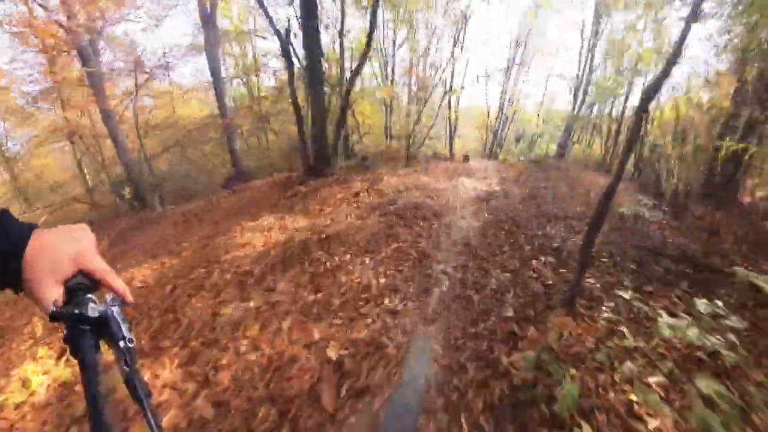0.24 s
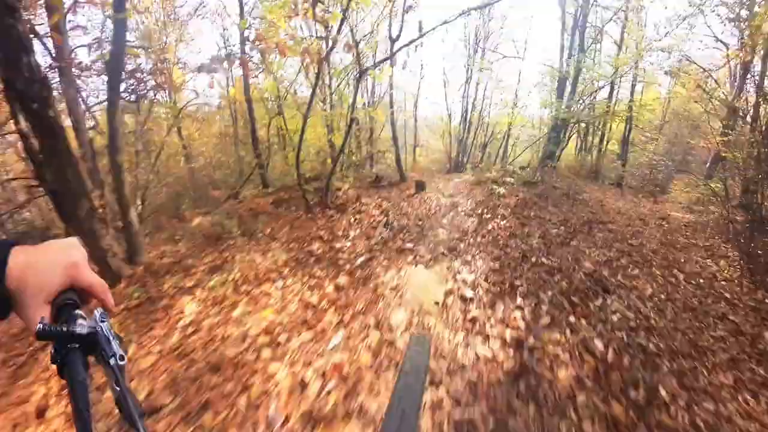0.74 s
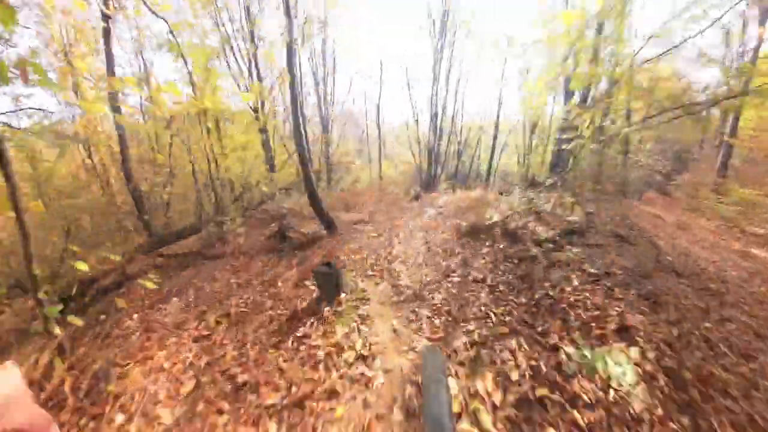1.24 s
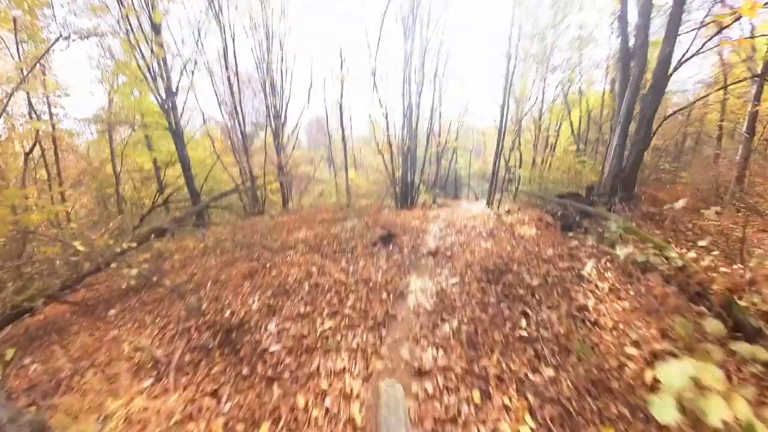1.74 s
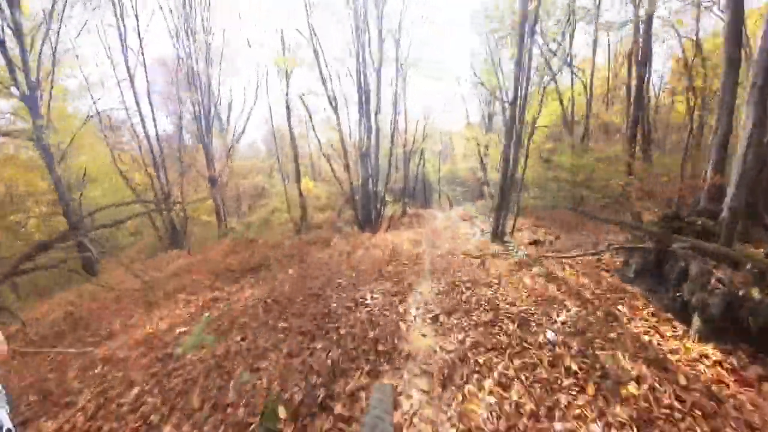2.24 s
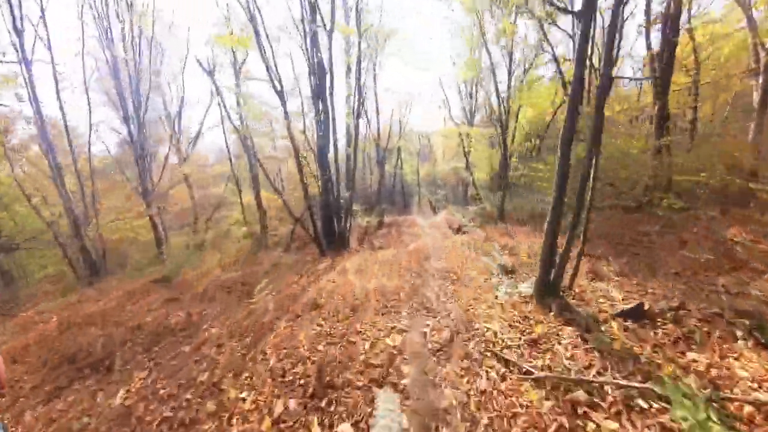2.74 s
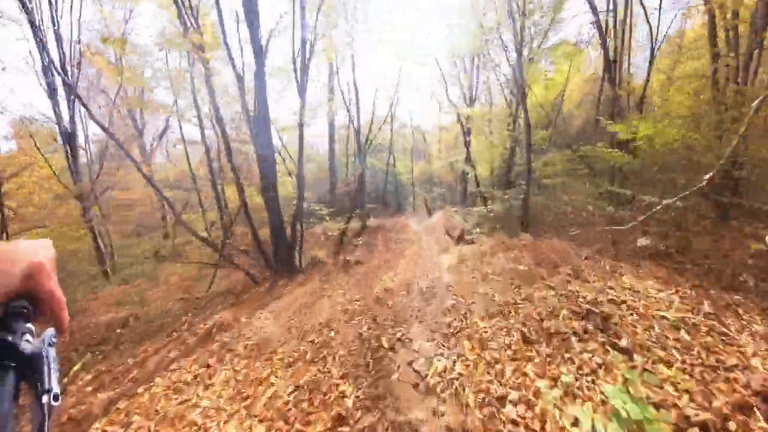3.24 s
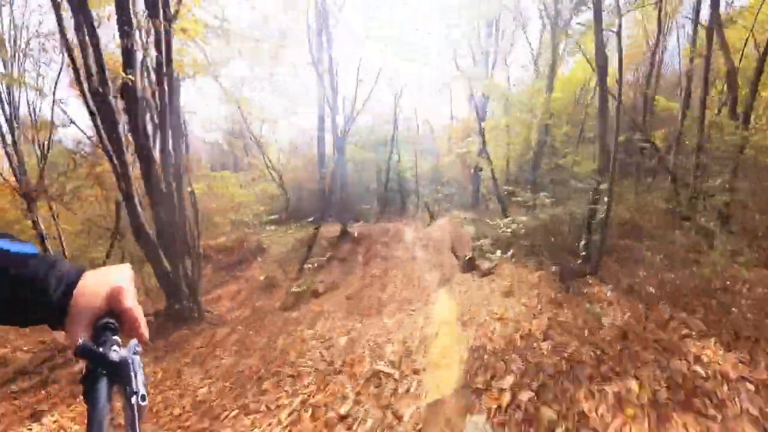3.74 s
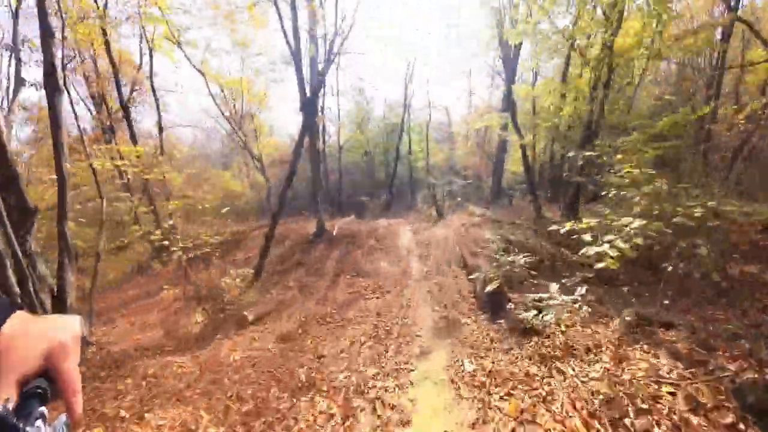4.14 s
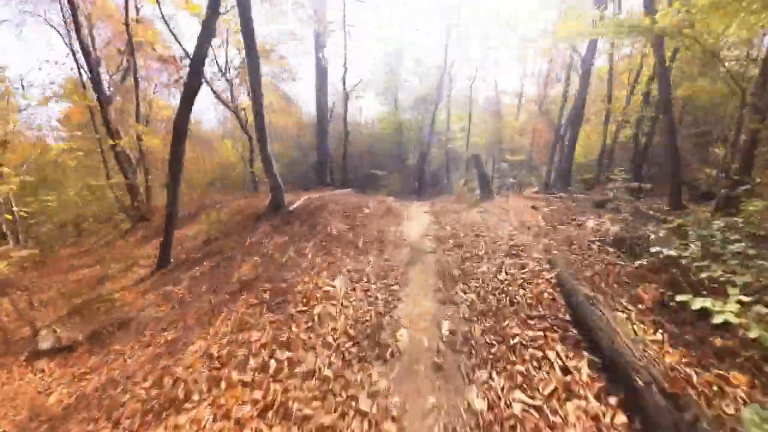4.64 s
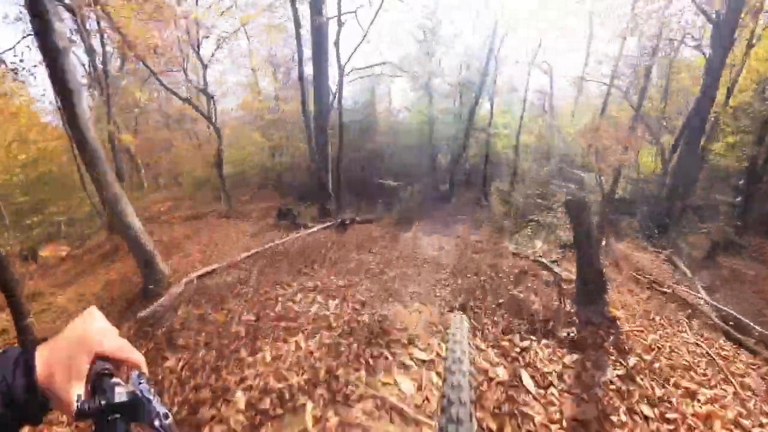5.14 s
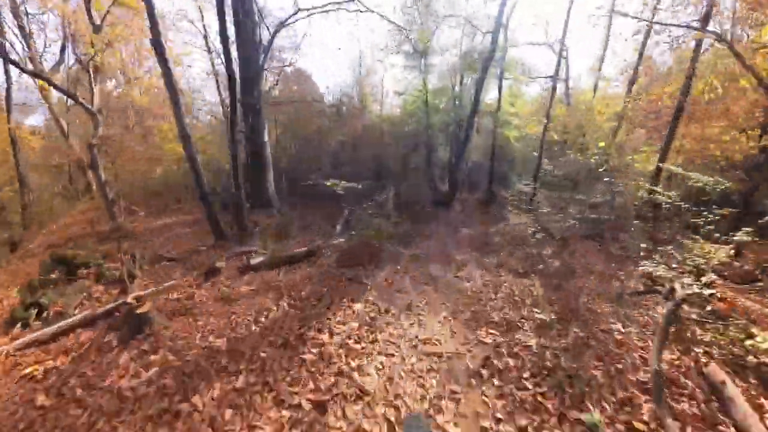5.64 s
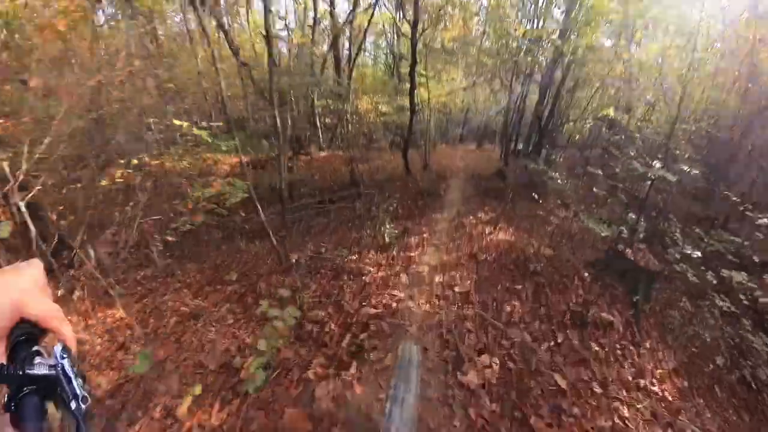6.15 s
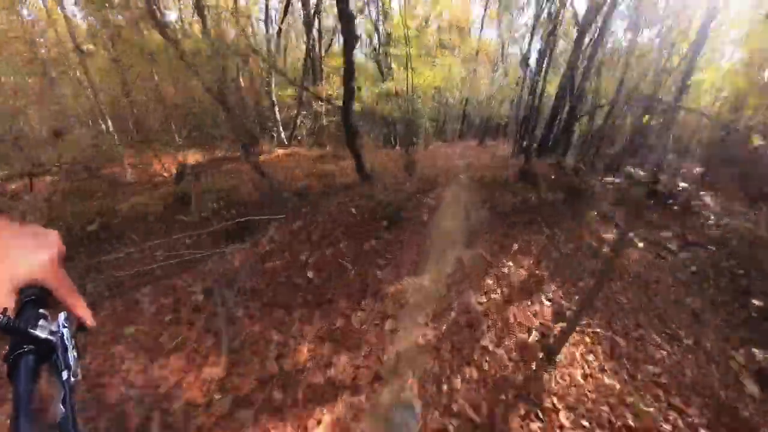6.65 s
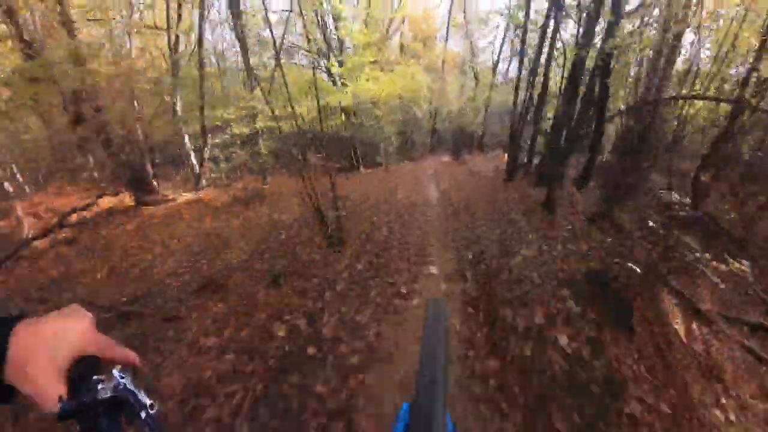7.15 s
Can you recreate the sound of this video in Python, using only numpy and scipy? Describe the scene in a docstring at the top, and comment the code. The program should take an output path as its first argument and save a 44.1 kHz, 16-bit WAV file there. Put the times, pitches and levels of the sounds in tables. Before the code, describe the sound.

A mountain bike rolls down a leafy dirt trail with a deep wobbling rumble, thumps, frame rattles and crackling dry leaves.

```python
"""Low wobble and thumps of a mountain bike rolling down a dirt trail under dry leaves.
A camera mount strapped to the rider swings near 43 Hz and jolts over roots and stones.
Tyres rumble, loose parts ring the frame and chain, leaves crunch through the microphone's
whistling port. Faint fuzzy whistles come and go; loud thumps duck the treble."""
import sys
import numpy as np
from scipy import signal
from scipy.fft import rfft, irfft, next_fast_len
from scipy.io import wavfile
from scipy.ndimage import uniform_filter1d

SR = 44100
rng = np.random.default_rng(int(sys.argv[2]) if len(sys.argv) > 2 else 0)


def log_audio(samples):
    """Write samples as a 16-bit WAV file to the path given in sys.argv[1]."""
    # one column per channel
    frames = np.atleast_2d(samples).T
    # limit to full scale, then quantise
    limited = np.clip(frames, -1, 1)
    pcm = np.round(limited * 32767).astype(np.int16)
    wavfile.write(sys.argv[1], SR, pcm)


N = 325458

# root and stone impacts: (time [s], level [dB])
JOLTS = [(0.048, -4), (0.068, -10.5), (0.182, -7.5), (0.41, -7), (0.572, -16), (0.588, -17.5),
         (0.725, -16.5), (0.738, -7), (0.786, -16), (0.804, -7), (0.929, -9), (0.974, -20), (1.038, -7.5),
         (1.051, -13), (1.067, -12.5), (1.125, -18.5), (1.211, -6.5), (1.229, -8.5), (1.398, -21),
         (1.414, -4), (1.431, -14), (1.486, -18.5), (1.595, -11.5), (1.621, -10), (1.75, -9.5),
         (1.76, -7.5), (1.776, -9), (1.873, -10.5), (1.886, -10), (1.902, -10), (1.984, -7.5), (2.069, -10),
         (2.262, -10), (2.35, -10), (2.363, -10.5), (2.472, -20), (2.704, -8), (2.772, -9), (2.791, -7),
         (3.224, -17.5), (3.476, -17.5), (3.527, -31), (3.546, -6), (3.814, -9.5), (4.016, -13.5),
         (4.029, -16), (4.14, -11.5), (4.306, -15), (4.347, -17), (4.676, -14), (4.698, -11), (4.783, -10),
         (4.797, -9), (5.038, -22), (5.355, -18), (5.511, -12.5), (5.648, -13.5), (5.728, -15),
         (5.755, -10.5), (5.773, -13), (5.828, -2), (5.843, -12), (5.893, -12.5), (5.96, -8.5),
         (5.981, -13), (6.212, -6), (6.231, -30), (6.24, -8.5), (6.46, -15.5), (6.576, -9.5), (6.591, -7),
         (6.764, -13.5), (6.818, -15.5), (6.844, -9), (7.096, -23), (7.108, -22)]
# loose parts hitting the frame:
# (time [s], level [dB], frame centre [Hz], clink re knock [dB], clink centre [Hz])
KNOCKS = [(0.08, -28, 402, -27, 2480), (0.17, -32, 388, -42, 3180), (0.27, -35.5, 636, -25, 2212),
          (0.367, -33.5, 600, -22, 2300), (0.393, -41, 500, -30, 2300), (0.4225, -24, 615, -33, 2067),
          (0.569, -37, 495, -30, 2200), (0.9, -42, 952, -8, 3840), (0.922, -28, 373, -28, 2707),
          (1.029, -32, 324.8, -39, 2360), (1.058, -30.5, 458.3, -31, 2336), (1.213, -15.5, 722, -21, 2030),
          (1.274, -18, 710, -27, 2140), (1.329, -27.5, 770, -32, 2800), (1.584, -25.5, 531, -15, 3850),
          (1.616, -40, 502, -25, 2373), (1.746, -30, 343, -17, 2950), (1.84, -20, 554, -21, 3170),
          (1.946, -31, 607, -26, 2417), (1.97, -19.5, 540.5, -30.5, 2437), (2.215, -22.5, 700, -36, 2980),
          (2.2519, -22, 699, -18, 4220), (2.338, -23, 511, -27, 3056), (2.67, -23, 848.7, -16.5, 2625),
          (2.688, -14.5, 582, -22, 2520), (2.737, -19, 786, -19, 2670), (2.755, -19, 650, -26, 4190),
          (2.842, -23, 614.6, -24, 2483), (2.906, -34.5, 556.5, -33, 3952), (2.984, -32.5, 754, -16, 3210),
          (3.211, -40, 962, -1, 2662), (3.242, -46, 1118, -1.5, 2586), (3.406, -30, 556.6, -20, 3604),
          (3.506, -27.5, 751, -29, 3967), (3.646, -34.5, 949, -9, 3896), (3.774, -26, 665.4, -34, 3716),
          (4.01, -35, 378, -35, 3776), (4.092, -30, 901, -19, 3730), (4.192, -30.5, 735.5, -24, 2750),
          (4.339, -22, 452.8, -22.5, 4320), (4.471, -31, 611.7, -28, 3694), (4.548, -17, 561.7, -20, 2985),
          (4.621, -37, 595, -22, 3030), (4.673, -17.5, 485.4, -29, 3160), (4.745, -21, 653.2, -24, 3678),
          (5.024, -25, 320, -29, 3525), (5.426, -25, 495.5, -39, 3120), (5.467, -23.5, 702.7, -29, 2402),
          (5.618, -27, 547, -15, 3461), (5.802, -21, 427.2, -36, 3154), (5.949, -26.5, 561, -33, 2407),
          (6.046, -44, 775.3, -26, 2292), (6.206, -18.5, 841, -18.5, 4598), (6.298, -31.5, 473, -25, 2076),
          (6.468, -22, 707, -19.5, 2513), (6.551, -24.5, 603, -18, 2194), (6.566, -20, 598.4, -18, 2574),
          (6.839, -35, 351.8, -34, 2365), (7.03, -20.5, 705.4, -32, 2403),
          (7.103, -17.5, 605.4, -42.5, 3050), (7.224, -25.5, 431.5, -25, 2861)]


def mount_wobble(rest_db=-31.5, drift=0.048, slip=0.3366, overtone_db=-20,
                 wind_db=-9, wind_hz=40, wind_bandwidth_hz=50):
    """One low mode, pushed off pitch by the ground, most when it swings least; gusts flutter with it."""
    # bouts of swinging on the strap: (middle [s], length [s], level [dB], pitch [Hz])
    swings = [(0.065, 0.11, -21, 45.8), (0.124, 0.073, -13.5, 42.9), (0.232, 0.15, -17, 38.5),
              (0.307, 0.043, -16, 45.4), (0.374, 0.08, -14, 45.8), (0.492, 0.13, -19.5, 42.27),
              (0.609, 0.25, -16.5, 40.74), (0.739, 0.042, -10, 40.54), (0.813, 0.12, -16.5, 39.65),
              (0.949, 0.12, -15, 46.1), (1.071, 0.089, -15.5, 37.14), (1.142, 0.024, -11.5, 44.64),
              (1.229, 0.268, -19.5, 44), (1.437, 0.051, -10, 46.17), (1.506, 0.066, -17, 42.3),
              (1.621, 0.53, -19.5, 41.57), (1.783, 0.074, -28, 40.26), (1.909, 0.18, -16, 43.37),
              (2.007, 0.092, -20, 52.56), (2.115, 0.19, -17, 42.1), (2.268, 0.096, -15, 49.86),
              (2.383, 0.099, -15, 43.25), (2.5, 0.086, -16.5, 45.6), (2.748, 0.4, -18.5, 45.7),
              (2.849, 0.33, -20.5, 45.04), (3.012, 0.12, -18.5, 43.45), (3.219, 0.4, -15.5, 44.2),
              (3.532, 0.15, -14.5, 42.7), (3.683, 0.17, -14.5, 47.7), (3.877, 0.29, -13, 46.4),
              (4.03, 0.042, -15.5, 43.28), (4.186, 0.17, -14, 44.7), (4.357, 0.094, -13.5, 50.28),
              (4.447, 0.21, -17, 44.47), (4.575, 0.19, -20, 45.36), (4.7, 0.071, -15, 46.32),
              (4.808, 0.2, -15, 44.04), (4.929, 0.085, -15, 45.85), (5.037, 0.045, -12.5, 48.93),
              (5.094, 0.07, -16.5, 46.8), (5.167, 0.15, -15.5, 42.23), (5.355, 0.092, -15, 45.71),
              (5.437, 0.13, -19, 52.5), (5.536, 0.17, -19.5, 40.6), (5.659, 0.093, -13, 46.1),
              (5.773, 0.16, -14, 46.5), (5.874, 0.096, -13, 40.58), (6.023, 0.3, -15.5, 38.45),
              (6.236, 0.11, -13.5, 45.56), (6.328, 0.094, -17, 47.83), (6.501, 0.11, -18, 45.55),
              (6.605, 0.13, -15, 43.8), (6.782, 0.077, -12.5, 42.1), (6.862, 0.064, -14.5, 40.73),
              (6.95, 0.067, -13.5, 51.7), (7.002, 0.039, -17.5, 52.98), (7.068, 0.054, -17, 45.9),
              (7.154, 0.18, -18.5, 50.72), (7.251, 0.092, -14, 43.86)]
    power = np.full(N, amp(2 * rest_db))
    for s, length_s, db, _ in swings:
        arch = np.sin(np.linspace(0, np.pi, round(length_s * SR)))
        add(power, s - length_s / 2, (amp(db) * arch) ** 2)
    level = np.sqrt(power)
    pitch_hz = curves([(s, hz) for s, _, _, hz in swings])[0]
    pitch_spread = drift + slip * np.clip(1 - level / 0.0816, 0, 1)
    phase = 2 * np.pi * np.cumsum(pitch_hz * (1 + pitch_spread * wander(ms=14.8))) / SR
    swing = np.sqrt(2) * (np.sin(phase) + amp(overtone_db) * np.cos(2 * phase))
    b, a = signal.iirpeak(wind_hz, wind_hz / wind_bandwidth_hz, SR)
    wind = signal.lfilter(b, a, signal.lfilter(b, a, rng.standard_normal(N)))
    return level * unit_rms(swing + amp(wind_db) * unit_rms(wind))


def jolts(width_ms=1.18, rebound=0.29, rebound_widths=1.9, click_db=-22):
    """Each impact is a short push of either sign inside a wider, weaker swing the other way."""
    out, t_ms = np.zeros(N), np.arange(-800, 800) / SR * 1000
    for (s, db), (side, stretch) in zip(JOLTS, rng.uniform(-1.24, 1, (len(JOLTS), 2))):
        u = t_ms / (width_ms * (1 + stretch / 5))
        push = np.exp(-.5 * u ** 2) - rebound * np.exp(-.5 * ((u - 1.5) / rebound_widths) ** 2)
        click = amp(click_db) * np.exp(-np.hypot(3.7 * (u + 1), 0.25))  # sharp, at the thump's start
        add(out, s - 800 / SR, np.sign(side) * amp(db) * (push + click) / (1 - rebound))
    return out


def tyres(lumpy_db=2.5, gritty_db=8.0, taps_db=-6, taps_per_s=120):
    """Dirt heard through the frame: rumble swells at jolts, grit at knocks; single pebbles tap."""
    # rolling between bumps: (time [s], rumble [dB], grit [dB])
    rolling = [(0.1, -24.5, -53.5), (0.76, -34, -48), (1.28, -32, -46.5), (1.66, -32.5, -49.5),
               (2.14, -29, -44.5), (2.46, -36, -48), (2.75, -27, -50), (3.05, -42, -70.5),
               (3.35, -28.5, -52), (3.63, -27.5, -48.5), (3.85, -33, -72), (4.09, -33.5, -47),
               (4.61, -25.5, -46.5), (4.83, -31, -50.5), (5.39, -28, -46.5), (5.81, -27, -49.5),
               (6.32, -36.5, -47.5), (6.8, -33.5, -51.5), (7.12, -22.5, -39.5), (7.3, -25, -42)]
    # tyre rumble spectrum: (frequency [Hz], gain [dB])
    rumble_eq = [(35, -110), (60, 16), (73, -0.5), (102, -3), (174, -1.5), (500, -27), (650, -95),
                 (1100, -120)]
    # grit spectrum: (frequency [Hz], gain [dB])
    grit_eq = [(150, -70), (250, -9), (523, -6), (745, -14.5), (835, -11), (936, -23), (1400, -27),
               (1560, -32.5), (2020, -33.5), (3000, -43), (3900, -58), (6600, -120)]
    rumble_db, grit_db = curves(rolling)
    shudder = amp(-17.5) * swells(JOLTS, decay_ms=22.7, lead_ratio=0.78)
    scatter = amp(-17.5) * swells(KNOCKS, decay_ms=28.7, lead_ratio=0.2)
    roughness = wander(ms=12)
    rumble = coloured(amp(lumpy_db * roughness) * rng.standard_normal(N), rumble_eq)
    pebbles = (rng.random(N) < taps_per_s / SR) * rng.uniform(-0.71, 1, N)
    taps = coloured(uniform_filter1d(pebbles, size=20), grit_eq[1:])
    flicker = np.tanh((roughness + wander(ms=3) / 2) / 2)
    grit = coloured(amp(gritty_db * flicker) * rng.standard_normal(N), grit_eq)
    low = np.hypot(amp(rumble_db), shudder) * unit_rms(rumble)
    high = np.hypot(amp(grit_db), scatter) * (unit_rms(grit) + amp(taps_db) * unit_rms(taps))
    return low + high


def knocks(rise_s=0.00081):
    """Each blow rings the frame modes near its centre frequency; chain links clink and chatter."""
    # frame resonances: (frequency [Hz], relative level [dB], t60 [s])
    frame_modes = [(331, 11, 0.082), (396.6, 9.5, 0.078), (469, 6.5, 0.036), (562, 5.5, 0.037),
                   (686, -2.5, 0.05), (798, -6.5, 0.063), (1070, -12, 0.0045), (1353, -8.5, 0.067)]
    # chain resonances: (frequency [Hz], relative level [dB], t60 [s])
    chain_modes = [(1805, 14.5, 0.017), (2650, -2.5, 0.067), (3910, -1, 0.065), (4740, -4, 0.032),
                   (5420, -1.5, 0.033)]
    out, t = np.zeros(N), np.arange(3000) / SR
    rise = 1 - np.exp(-(t / rise_s) ** 2)
    for s, db, frame_hz, clink_db, clink_hz in KNOCKS:
        frame = ring(frame_modes, frame_hz, t, log_spread=0.39)
        chain = ring(chain_modes, clink_hz, t, log_spread=0.54)
        chatter = 1 + unit_rms(uniform_filter1d(rng.standard_normal(len(t)), size=30))
        add(out, s, amp(db) * rise * (frame + amp(clink_db) * chain * chatter))
    return out


def leaves(cracks_per_s=600, crack_spread_db=5.5, hiss_ratio=2.04, clumps_db=1.2, snap_t60_s=0.007):
    """Tiny uneven cracks in a fine hiss, swelling as heaps are crushed; single snaps on top."""
    # leaf carpet under the wheels: (time [s], level [dB])
    carpet = [(0.0, -58), (1.01, -59.5), (1.42, -53), (1.64, -56.5), (1.97, -58), (2.16, -57.5),
              (2.41, -56), (2.46, -48), (2.65, -44.5), (2.75, -58), (2.96, -51.5), (3.08, -48.5),
              (3.72, -55.5), (4.15, -57), (4.46, -45.5), (4.6, -41.5), (4.87, -53), (5.57, -52),
              (5.69, -56), (5.9, -60.5), (6.76, -61), (7.13, -51.5), (7.38, -58.5)]
    # rustle spectrum, port resonance near 10 kHz: (frequency [Hz], gain [dB])
    rustle_eq = [(880, 3), (1500, -15), (1540, -18), (1900, -10.5), (2350, -16), (2620, -13), (3250, -14.5),
                 (3950, -9.5), (4670, -12), (5570, -12.5), (8000, -9), (9730, 2.5), (12500, -16.5),
                 (15600, -26)]
    # crushed heaps, each lasting 2.5 widths: (middle [s], width [ms], level [dB])
    heaps = [(0.142, 8.4, -50), (0.342, 33, -52.5), (0.533, 18, -57.5), (1.004, 32, -55), (1.098, 13, -53),
             (1.199, 17.3, -48.5), (1.298, 31, -57), (1.396, 31, -41.5), (1.541, 12.7, -56),
             (1.582, 26, -47.5), (1.741, 10.5, -47), (1.856, 6.8, -44.5), (1.955, 21, -52),
             (2.004, 10.5, -52.5), (2.083, 7.5, -49), (2.199, 23, -53), (2.254, 24, -52.5),
             (2.635, 10.8, -53), (2.701, 73, -50.5), (2.847, 8.1, -51), (2.948, 20, -57), (3.08, 58, -51.5),
             (3.198, 26, -50), (3.523, 11.2, -42.5), (3.651, 5.2, -52), (3.767, 12.2, -49.5),
             (3.838, 5, -54), (3.989, 13, -55), (4.128, 29, -49.5), (4.236, 23, -50.5), (4.301, 20, -51),
             (4.408, 24.6, -52), (4.487, 17.6, -52), (4.624, 39, -42), (4.661, 9.1, -36),
             (4.767, 14, -34.5), (4.897, 5.1, -57), (5.148, 23, -50.5), (5.203, 8.5, -47.5),
             (5.352, 15.3, -43.5), (5.568, 36, -47.5), (5.603, 62, -46.5), (5.702, 38.8, -45),
             (5.803, 16.2, -52), (5.909, 25.3, -50), (6.196, 33.5, -47), (6.44, 20, -53),
             (6.553, 29, -48.5), (6.738, 9, -49.5), (6.981, 29, -56.5), (7.049, 22, -56), (7.108, 12, -44),
             (7.352, 19, -48)]
    # leaves and twigs breaking: (time [s], level [dB])
    breaks = [(0.21, -37), (0.343, -36), (0.512, -36.5), (0.901, -32), (1.031, -53), (1.442, -46),
              (1.467, -39), (1.517, -42), (1.743, -33.5), (1.951, -41), (2.09, -45), (2.252, -36),
              (2.316, -39.5), (2.746, -34), (2.754, -28.5), (3.647, -36), (3.789, -30), (3.926, -42),
              (4.105, -38), (4.137, -29), (4.34, -32), (4.662, -42), (4.69, -31.5), (4.82, -42),
              (5.723, -35), (5.75, -43), (5.876, -42), (5.931, -45), (6.086, -40.5), (6.199, -33),
              (6.208, -27.5), (6.441, -33.5), (6.548, -33.5), (6.57, -33), (6.739, -33.5), (7.234, -41)]
    onsets = rng.random(N) < cracks_per_s / SR
    cracks = onsets * amp(crack_spread_db * np.minimum(rng.exponential(1, N), 3.5))
    drive = unit_rms(cracks * rng.standard_normal(N)) + hiss_ratio * rng.standard_normal(N)
    rustle = coloured(drive * amp(clumps_db * wander(ms=15)), rustle_eq)
    rustle = unit_rms(patchy(rustle, spread_db=2.2))
    level = amp(curves(carpet)[0])
    for s, width_ms, db in heaps:
        u = np.linspace(0, 1, round(2.5 * width_ms * SR / 1000))
        trapezoid = np.minimum(np.minimum(u, 1 - u) / 0.31, 1)
        add(level, s - len(u) / SR / 2, amp(db) * trapezoid)
    snap_level, t = np.zeros(N), np.arange(1500) / SR
    for s, db in breaks:
        add(snap_level, s - .0005, 2 * amp(db - 60 * t / snap_t60_s) * (1 - np.exp(-t / 0.0001)))
    snaps = snap_level * unit_rms(coloured(rng.standard_normal(N), rustle_eq))
    return level * rustle + coloured(snaps, [(1500, -14), (4200, -4), (7000, -2)])


def brake_rub(bandwidth_hz=40):
    """Fuzzy whistles, perhaps a pad brushing its disc: noise in one narrow resonance."""
    # whistles: (middle [s], length [s], pitch [Hz], level [dB])
    rubs = [(1.08, 0.22, 1129, -56.5), (1.25, 0.38, 844, -53.5), (3.12, 0.14, 842, -59),
            (3.22, 0.35, 1252, -59), (3.5, 0.27, 841, -48.5), (5.25, 0.38, 822, -54)]
    out = np.zeros(N)
    for s, length_s, hz, db in rubs:
        fade = np.hanning(round(length_s * SR))
        b, a = signal.iirpeak(hz, hz / bandwidth_hz, SR)
        tone = signal.lfilter(b, a, rng.standard_normal(SR))[:len(fade)]
        add(out, s - length_s / 2, amp(db) * unit_rms(tone) * fade)
    return out


def ring(modes, centre_hz, t, log_spread):
    """Modes struck once, slightly detuned, weighted towards centre_hz."""
    hz, db, t60_s = np.transpose(modes)[:, :, None]
    detune, phase = rng.uniform(-0.45, 1, (2, len(modes), 1))
    weight = amp(db) * np.exp(-.5 * (np.log(hz / centre_hz) / log_spread) ** 2)
    waves = np.sin(2 * np.pi * hz * (1 + 0.079 * detune) * t + 0.5 * phase)
    return (weight * amp(-60 * t / t60_s) * waves).sum(axis=0) / np.linalg.norm(weight)


def swells(events, decay_ms, lead_ratio):
    """Soft envelope peaking at each event's level; overlaps add in power."""
    power = np.zeros(N)
    for s, db, *_ in events:
        power[round(s * SR)] += amp(2 * db)
    u = np.arange(-SR // 5, SR // 5) / SR * 1000 / decay_ms
    swell = np.exp(-np.where(u < 0, u / lead_ratio, u) ** 2)
    return np.sqrt(abs(signal.oaconvolve(power, swell, "same")))


def patchy(x, spread_db):
    """Patches of about 1.5 kHz by 30 ms swell and sink independently."""
    spectra = signal.stft(x, nperseg=256, noverlap=192)[2]
    field = rng.standard_normal(spectra.shape[::-1]).T
    field = uniform_filter1d(uniform_filter1d(field, size=9, axis=0), size=20, axis=1)
    return signal.istft(spectra * amp(spread_db * unit_rms(field)), nperseg=256, noverlap=192)[1][:N]


def coloured(x, eq):
    """Filter x by (frequency [Hz], gain [dB]) points."""
    point_hz, db = np.transpose(eq)
    size = next_fast_len(N)
    hz = np.fft.rfftfreq(size, 1 / SR)
    gain = amp(np.interp(np.log(hz + 1), np.log(point_hz + 1), db))
    return irfft(rfft(x, size) * gain, size)[:N]


def wander(ms):
    """Smooth noise, rms 1, changing within about ms."""
    size = round(ms * SR / 1000) + 1
    return unit_rms(uniform_filter1d(uniform_filter1d(rng.standard_normal(N), size), size))


def curves(rows):
    """One per-sample curve for each column after time [s]."""
    s, *columns = np.transpose(rows)
    return [np.interp(np.arange(N) / SR, s, column) for column in columns]


def add(mix, start_s, sound):
    part = mix[max(round(start_s * SR), 0):][:len(sound)]
    part += sound[:len(part)]


def amp(db):
    return 10 ** (np.asarray(db) / 20)


def unit_rms(x):
    return x / np.sqrt(np.mean(x ** 2) + 1e-20)


def scene():
    return (mount_wobble() + tyres() + jolts() + knocks() + brake_rub() + leaves())[None]


def record(dry, knee_db=-24, duck_db_per_db=0.12, recover_db_s=150, split_hz=500,
           ceiling=0.65, cutoff_hz=15700):
    """Thump-keyed gain control ducks the upper band; the lower band soft-clips; then a low-pass."""
    thump = signal.sosfilt(signal.butter(2, [80, 300], "bandpass", fs=SR, output="sos"), dry)
    power_db = 10 * np.log10(abs(uniform_filter1d(thump[0] ** 2, size=300, origin=149)) + 1e-12)
    fall_db = np.arange(N) * recover_db_s / SR
    held_db = np.maximum.accumulate(power_db + fall_db) - fall_db
    over_db = np.maximum(held_db - knee_db, 0)
    upper = signal.sosfiltfilt(signal.butter(2, split_hz, "highpass", fs=SR, output="sos"), dry)
    lower = ceiling * np.tanh((dry - upper) / ceiling)
    mixed = lower + upper * amp(-duck_db_per_db * uniform_filter1d(over_db, size=100))
    lowpass = signal.firwin(511, cutoff_hz, window=("kaiser", 9), fs=SR)
    return signal.oaconvolve(mixed, lowpass[None], "same")


dry = scene()
out = record(dry)
log_audio(out)
```